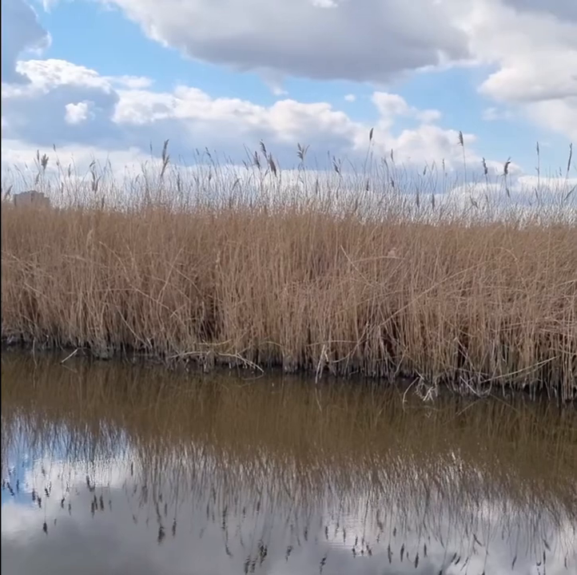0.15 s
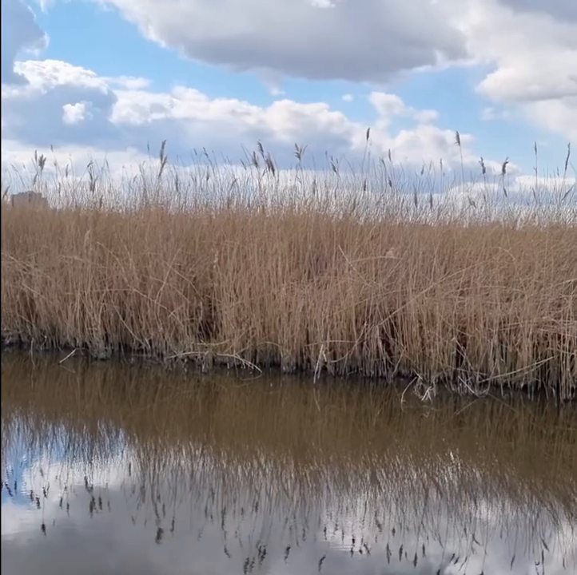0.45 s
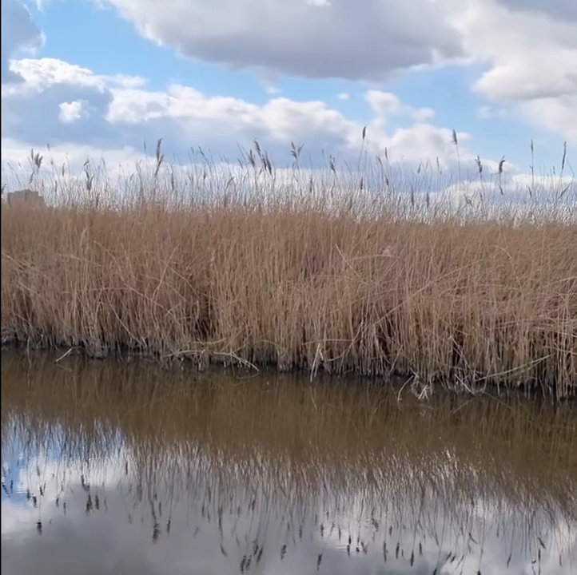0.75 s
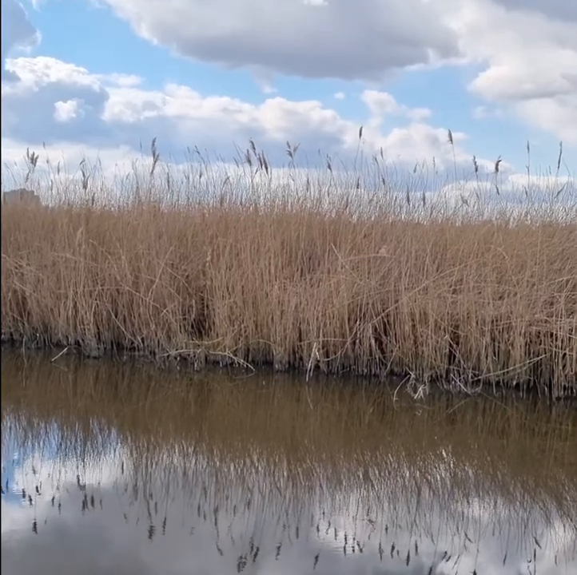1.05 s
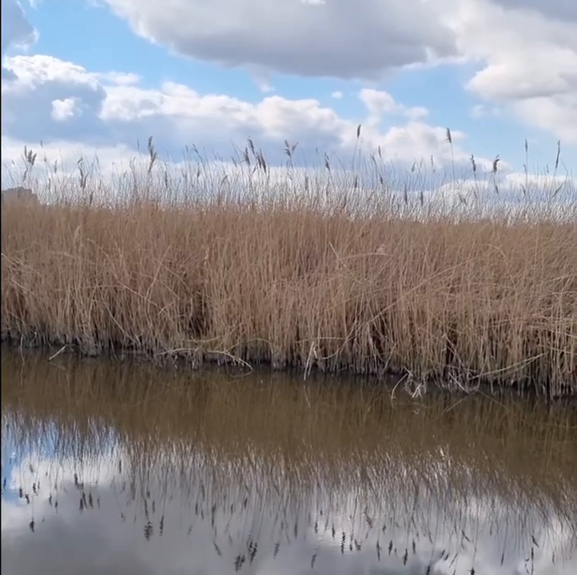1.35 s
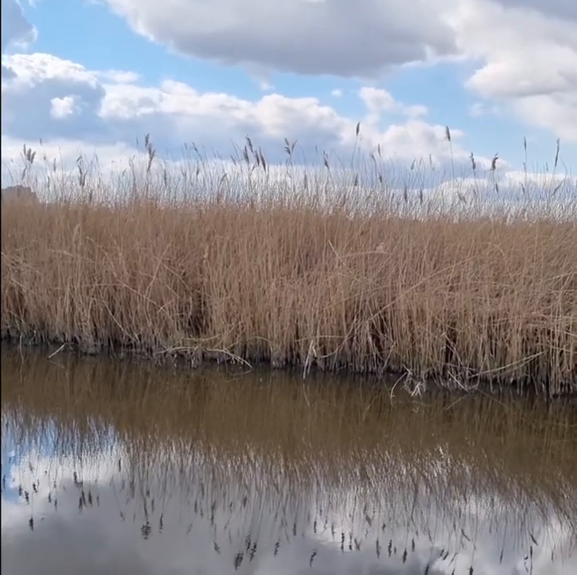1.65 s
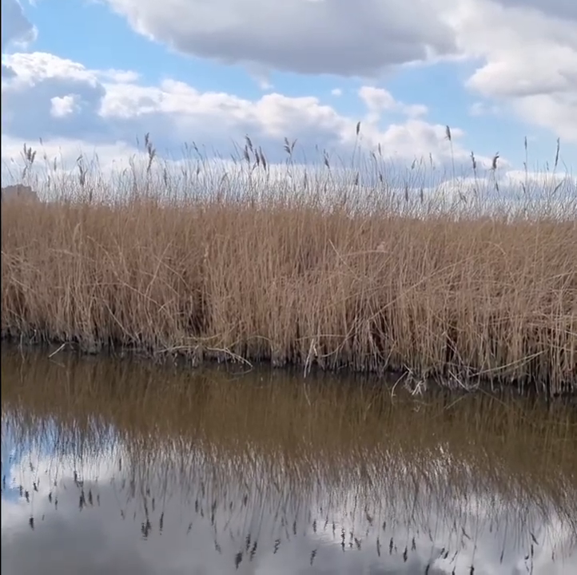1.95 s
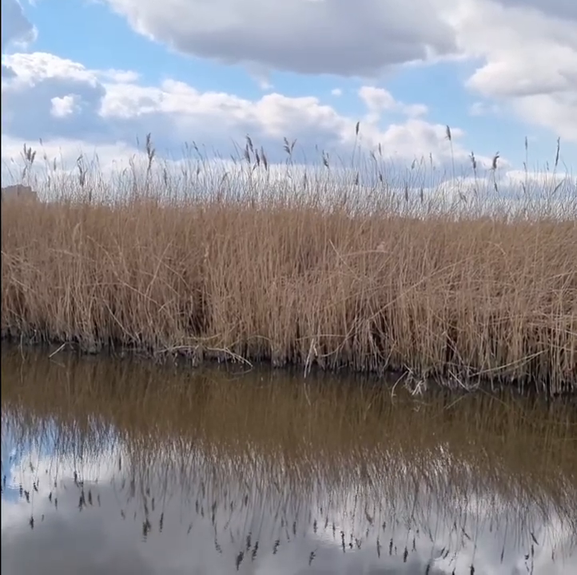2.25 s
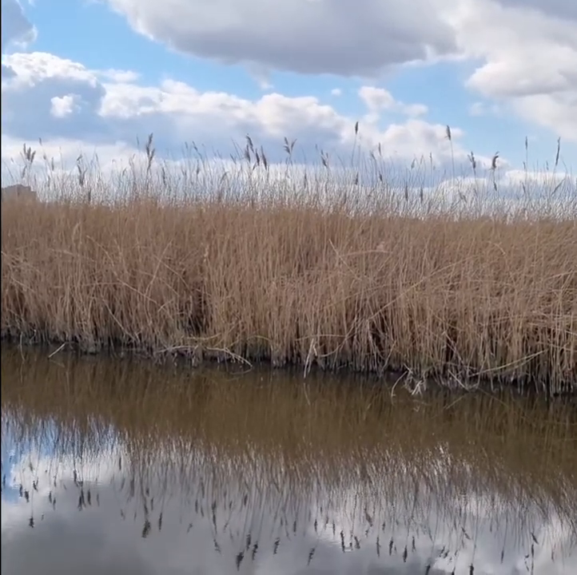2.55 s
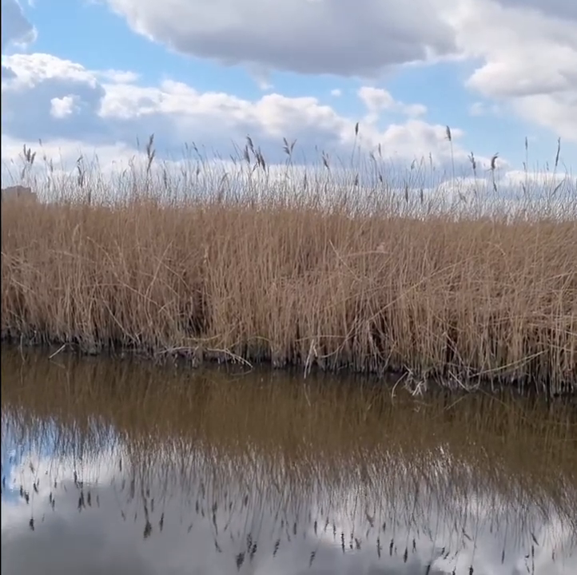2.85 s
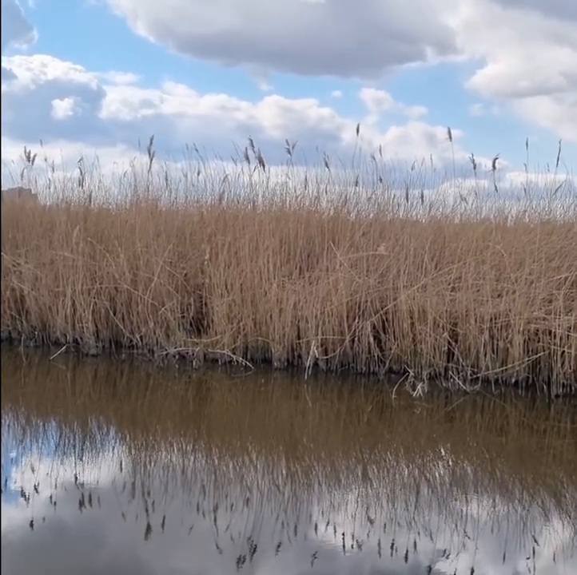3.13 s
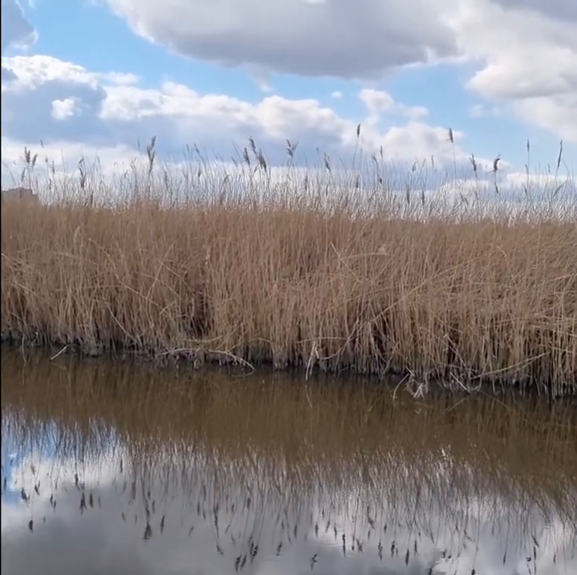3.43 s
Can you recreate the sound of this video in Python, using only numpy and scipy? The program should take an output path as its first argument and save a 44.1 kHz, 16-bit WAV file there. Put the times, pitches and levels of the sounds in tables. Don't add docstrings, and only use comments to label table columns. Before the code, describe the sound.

An unseen bird in waterside reeds repeats bright sweeping notes, then trills, chatters harshly, flicks upward and ends in pulsed rattles, over wind rumble on a phone microphone, faint leaf hiss and distant traffic to the left.

```python
import sys
import numpy as np
from scipy import signal
from scipy.fft import rfft, irfft
from scipy.io import wavfile
from scipy.ndimage import uniform_filter1d

SR = 44100
rng = np.random.default_rng(int(sys.argv[2]) if len(sys.argv) > 2 else 0)


def output_pcm(signal):
    pcm = np.clip(np.atleast_2d(signal).T, -1, 1) * 32767
    wavfile.write(sys.argv[1], SR, np.round(pcm).astype(np.int16))


def gain_from_db(level_db):
    decades = np.asarray(level_db, float) / 20
    return 10 ** decades


N = 158319
T = np.arange(N) / SR
BINS = np.arange(N // 2 + 1) * SR / N + 1e-3
START_S = 0.14872
CLEAR, HARSH = 0.33, 0.58
RASP_HZ, WAVER = 1500, 0.005
MAX_SYLLABLE = 9000


def colour(table):
    hz, db = np.array(table).T
    log_hz = np.log(BINS)
    below = np.maximum(np.log(hz[0]) - log_hz, 0)
    above = np.maximum(log_hz - np.log(hz[-1]), 0)
    return gain_from_db(np.interp(log_hz, np.log(hz), db) - 60 * (below + above))


def walk(rate, size=N):
    hold = max(int(SR / rate), 1)
    steps = np.repeat(rng.standard_normal(size // hold + 1), hold)
    return 1.3 * uniform_filter1d(uniform_filter1d(steps, hold), hold)[:size]


def bed(table, db, pan_db, diffuse, lead_rad, swell_db, flicker_db, rate):
    noise = rfft(rng.standard_normal((3, N))) * colour(table)
    share = np.clip(diffuse, 0, 1)
    lead = np.exp(1j * lead_rad * np.array([[1], [0]]))
    pair = np.sqrt(1 - share) * noise[0] * lead + np.sqrt(share) * noise[1:]
    swell = walk(2.5)
    place = 2 * np.log2(BINS)
    first = int(2 * np.log2(table[0][0])) - 1
    last = int(2 * np.log2(table[-1][0])) + 1
    out = 0
    for k in range(first, last + 1):
        band = irfft(pair * np.clip(1 - abs(place - k), 0, 1), N)
        out = out + band * gain_from_db(swell_db * swell + flicker_db * walk(rate))
    out = out * gain_from_db(np.array([[pan_db], [-pan_db]]) / 2)
    return out * gain_from_db(db) / np.sqrt(np.mean(out.mean(axis=0) ** 2))


def add_syllable(out, at_s, shape, orders, db=0, stretch=1, rough=CLEAR, pitch=1, air_db=-99):
    s, hz, level_db, bright_db = np.array(shape, float).T
    s = (s - s[0]) * stretch
    t = np.arange(int(s[-1] * SR)) / SR

    def smooth(values):
        return uniform_filter1d(np.interp(t, s, values), 132, mode="nearest")

    waver = 1 + WAVER * walk(300, MAX_SYLLABLE)[:len(t)]
    phase = 2 * np.pi * np.cumsum(pitch * smooth(hz) * waver) / SR
    edge = np.clip(np.minimum(t, s[-1] - t) / 0.0012, 0, 1)
    level = smooth(level_db) + db
    i = int(at_s * SR)
    out[i:i + len(t)] += edge * gain_from_db(level + air_db) * rng.standard_normal(len(t))
    for k, (multiple, order_db) in enumerate(orders):
        rasp = 1 + rough * walk(RASP_HZ, MAX_SYLLABLE)[:len(t)]
        size = gain_from_db(level + order_db + k * smooth(bright_db)) * rasp
        out[i:i + len(t)] += edge * size * np.sin(multiple * phase + k * k)


def arch(length, hz0, hz1, db, bright_db, top, fall):
    u = np.linspace(0, 1, num=12)
    rising = np.sin(1.2 * np.clip(u / top, 0, 1)) / np.sin(1.2)
    falling = 1 - fall * ((u - top) / (1.001 - top)) ** 2
    bend = np.where(u < top, rising, falling)
    level_db = db - 17 * abs((u - 0.55) / 0.55) ** 2
    return np.c_[u * length, hz0 + (hz1 - hz0) * bend, level_db, bright_db + 0 * u]


# band_hz, level_db (dB per Hz)
WIND = [(22, -30), (42, -7.5), (64, 1.5), (100, -6), (151, -16.5), (198, -15.5), (250, -23.5)]


def wind():
    return bed(WIND, -46, -0.17, 0.017 * (1 + (BINS / 90) ** 2), 0.3, 1.6, 1.48, 12)


# band_hz, level_db (dB per Hz)
ENGINES = [(240, -3), (300, 1.5), (400, -0.5), (480, -7)]
# time_s, level_db
ENGINE_SWELL = [(0, -4), (.6, -5.5), (1.3, 1.5), (1.7, -1.5), (3.59, 1.5)]


def engines():
    swell = gain_from_db(np.interp(T, *np.array(ENGINE_SWELL).T))
    return bed(ENGINES, -64, 1.8, 0.13, 0.5, 0.87, 1.5, 10) * swell


# band_hz, level_db (dB per Hz)
ROAD = [(480, -14), (627, -8.5), (786, 1.5), (985, 1), (1160, -1), (1510, -13), (2200, -23.5)]


def road():
    return bed(ROAD, -50.5, 7.56, 0.24, 0.72, 0.79, 1.02, 12)


# band_hz, level_db (dB per Hz)
REEDS = [(2200, -1.5), (3600, -1), (5000, -13.5), (6050, -20.5), (7300, -32)]


def reeds():
    return bed(REEDS, -75.5, -0.37, 1.0, 0, 0.82, 1.0, 8)


# band_hz, level_db (dB per Hz)
HISS = [(7300, 2.5), (9500, -0.5), (12000, 3.5), (15500, 3.5)]


def top_hiss():
    return bed(HISS, -97.5, -1, 1, 0, 0.3, 0.4, 8)


# time_s, pitch_hz, level_db, brightness_db
SWEEP = [(0, 2870, -61.5, -3.5), (.007, 3150, -51, 0), (.014, 3530, -54, 1), (0.022, 3580, -51, -5.5),
         (0.034, 3370, -56.5, 0.5), (.058, 3350, -56.5, -5.5), (.083, 2980, -68.5, 4.5),
         (.093, 2960, -71, -13), (.125, 2860, -66.5, -29.5), (.145, 2960, -77.5, -26.5)]
# multiple, level_db
SWEEP_ORDERS = [(1, -2), (1.5, -3)]
# multiple, level_db
SWEEP_TOP = [(2, -3)]
# start_s, level_db, stretch (ratio), pitch (ratio)
SWEEPS = [
    (0.147, 2, 1.07, 0.98),
    (0.376, 3, 0.97, 1.05),
    (0.612, 3, 1.07, 1.017),
    (0.865, 5, 1.0, 1.018),
    (1.123, 4, 1.08, 1.018),
]


def sweeps(out):
    for s, db, stretch, pitch in SWEEPS:
        add_syllable(out, s, SWEEP, SWEEP_ORDERS, db, stretch, pitch=pitch, air_db=-11)
        add_syllable(out, s, SWEEP[:4], SWEEP_TOP, db, stretch, rough=HARSH, pitch=pitch)


# band_hz, level_db
SONG_COLOUR = [(1300, -26.5), (2000, -6), (3000, -2), (5000, -4.5), (5900, -12), (6900, -19), (7600, -27),
               (8300, -42.5)]
# centre_hz, lift_db
THROAT = [(3620, 8), (4200, 4), (4720, 7), (5350, 7), (6450, 8)]


def tail(t60_s, db):
    decay = rng.standard_normal((2, N)) * gain_from_db(-60 * T / t60_s)
    return rfft(decay) / np.sqrt(np.sum(decay ** 2, axis=1, keepdims=True)) * gain_from_db(db)


def pond(song):
    pan_db, lag_s, width_hz = -6.5, -0.000044, 150
    direct = np.exp(-2j * np.pi * BINS * lag_s * np.array([[1], [0]]))
    near = direct + tail(0.11, -7.5)
    pan = gain_from_db(np.array([[pan_db], [-pan_db]]) / 2)
    lift_db = sum(db * np.exp(-((BINS - hz) / width_hz) ** 2 / 2) for hz, db in THROAT)
    voice = rfft(song) * colour(SONG_COLOUR) * gain_from_db(lift_db)
    return irfft(voice * (near * pan + tail(0.33, -12.5)), N)


# start_s, length_s, level_db
RISES = [
    (0.294, 0.027, -63.5),
    (0.51, 0.047, -57.5),
    (0.762, 0.05, -58.5),
    (1.019, 0.051, -58.5),
]


def rises(out):
    for s, length, db in RISES:
        shape = arch(length, 3060, 3960, db, -26.5, 1.0, 0)
        add_syllable(out, s, shape, [(1, 0.01), (1.5, 0)], rough=HARSH, air_db=-11)


# start_s, length_s, start_hz, middle_hz, end_hz,
# level_db
WHISTLES = [(0.31, 0.0094, 3600, 3400, 3500, -60.5), (.552, 0.009, 4500, 3710, 3580, -58),
            (1.229, 0.023, 3650, 3700, 3600, -66.5), (1.346, 0.019, 3200, 3650, 3600, -63.5),
            (1.367, 0.018, 3500, 3600, 3900, -58), (1.399, 0.023, 3000, 3200, 3600, -59.5),
            (1.44, 0.028, 3400, 3800, 4250, -58.5), (1.728, 0.041, 4005, 3860, 3200, -53.5),
            (1.915, 0.026, 3820, 3580, 3150, -64.5), (2.087, .04, 3700, 3300, 3500, -72.5),
            (2.243, 0.024, 4200, 3700, 3390, -67), (2.36, 0.024, 2800, 3340, 3100, -53),
            (2.335, .025, 3200, 4000, 4100, -59), (3.3, 0.13, 5950, 5480, 5150, -67.5),
            (3.267, .045, 6900, 6750, 6600, -71), (3.237, 0.034, 5250, 4400, 5150, -73),
            (0.88, .016, 6000, 5400, 6050, -56.5)]


def thin_whistles(out):
    for s, length, hz0, hz_mid, hz1, db in WHISTLES:
        shape = [(0, hz0, db - 6, 0), (length / 2, hz_mid, db, 0), (length, hz1, db - 7, 0)]
        add_syllable(out, s, shape, [(1, 0)], rough=0.45)


# start_s, length_s, start_hz, top_hz, level_db
TRILL = [
    (1.32, 0.037, 2476, 2980, -54),
    (1.371, 0.047, 2340, 3010, -48.5),
    (1.431, 0.038, 2460, 3286, -47),
    (1.49, 0.029, 2566, 3320, -48),
]
# brightness_db, rise (share of length), fall (share of bend)
TRILL_SHAPE = [(2.5, 0.32, 0.44), (-21, 0.41, .9), (-27, 0.36, 0.33), (-29, 0.59, 0.24)]


def trill(out):
    orders = [(1, 0.007), (1.5, 0.0055), (2, 0.0074)]
    for (s, length, hz0, hz1, db), shape in zip(TRILL, TRILL_SHAPE):
        add_syllable(out, s, arch(length, hz0, hz1, db, *shape), orders, air_db=-11)


# start_s, peak_db
TICKS = [
    (1.493, -75),
    (1.853, -71.5),
    (2.379, -95),
    (2.982, -76),
]


def ticks():
    out = np.zeros(N)
    for s, db in TICKS:
        decay = (T > s) * np.exp(-np.maximum(T - s, 0) / 0.0015)
        out += gain_from_db(db - 3.5) * rng.standard_normal(N) * decay
    return irfft(rfft(out) * colour([(5500, -0.5), (12000, -1.5), (15500, -3.5)]), N)


# time_s, pitch_hz, level_db, brightness_db
CHAT = [(0, 3036, -66.5, -10), (.003, 2562, -49.5, -10.5), (.007, 2186, -58.5, -2.5),
        (0.012, 1833, -55, 1.5), (.02, 1640, -56.5, 2), (0.028, 1455, -57.5, -13.5),
        (0.032, 1420, -85, -12)]
# multiple, level_db
CHAT_ORDERS = [(1, -6.5), (2, -4.5), (3, -7), (4, -10)]
# start_s, level_db, inharmonic_db, air_db
CHATS = [
    (1.58, -1, -6, -16),
    (1.619, 2.5, 2, -13.5),
    (1.703, 2, -19.5, -3.5),
    (1.743, 0.5, 1, 0),
    (1.838, 0.5, -22, -13),
    (1.877, 2.5, -7.5, -3.5),
    (1.969, -1, -14.5, 0),
    (2.01, 4.5, -5.5, -6),
    (2.104, 0, -9, -0.5),
    (2.143, 0.5, -11, -2),
]


def chatters(out):
    for s, db, inharmonic_db, air_db in CHATS:
        add_syllable(out, s, CHAT, CHAT_ORDERS, db, air_db=air_db)
        add_syllable(out, s, CHAT[2:], [(2.8, -5)], db + inharmonic_db, rough=HARSH)


# time_s, level_db (over the top of the hiss)
RUSTLE = [(1.62, -26.5), (1.68, 4), (1.9, 0.5), (1.95, -32)]


def rustle(hiss):
    treble = irfft(rfft(hiss) * (BINS > 11000), N)
    return gain_from_db(np.interp(T, *np.array(RUSTLE).T)) * treble


# time_s, pitch_hz, level_db, brightness_db
FLICK = [(0, 1130, -68, 7), (.004, 1344, -60, 0.5), (.01, 1830, -58.5, 0.5), (0.015, 2460, -58.5, -3.5),
         (0.021, 2650, -71, -5)]
# start_s, level_db
FLICKS = [
    (2.261, 1),
    (2.425, 3.5),
    (2.627, 0.5),
    (2.81, 1.5),
]


def flicks(out):
    for s, db in FLICKS:
        add_syllable(out, s, FLICK, [(2, -0.5), (3, -8.5), (4, -11), (5, -20)], db, air_db=1)


# time_s, pitch_hz, level_db, brightness_db
FAN = [(0, 556, -81, 3.5), (.012, 663.4, -68, 2), (.027, 873, -69, 2), (.042, 1069, -59, -2.5),
       (.057, 1154, -57.5, -0.5), (0.066, 1270, -62, -2), (.078, 1750, -52.5, -14.5),
       (.088, 2495, -55.5, -22), (0.092, 2520, -66, -13)]
# multiple, level_db
FAN_ORDERS = [(2, -4), (3, 0), (4, 2), (5, -3), (6, -7), (7, -10)]
# start_s, level_db, stretch (ratio), pitch (ratio)
FANS = [
    (2.296, -2, 1.0, 1.11),
    (2.456, 0, 0.98, 1.02),
    (2.662, -0.5, 1.0, 1.0),
    (2.846, -1, 1.03, 1.01),
]


def fans(out):
    for s, db, stretch, pitch in FANS:
        add_syllable(out, s, FAN, FAN_ORDERS, db, stretch, rough=HARSH, pitch=pitch, air_db=0)


# start_hz, end_hz
RATTLE_TONES_HZ = [(2380, 2470), (3870, 4230), (4650, 4980), (3500, 3600), (6330, 6370)]
# level_db, swell_db, roughness (ratio)
RATTLE_LINES = [(3.5, 17, 0.16), (1.5, 10.5, 0.35), (-6, 23.5, .6), (-12.5, 14, .6), (-14.5, 11.5, .15)]
# last_pulse_s, length_s, level_db, pitch (ratio), pulse_hz
RATTLES = [
    (3.228, 0.16, -58, 1.035, 61),
    (3.483, 0.15, -57, 1, 62.3),
]


def rattle(last_s, length, db, share, pulse_hz):
    duty, leak, jitter = 0.8, 1.7, 0.04
    u = np.clip((T - last_s) / length + 1, 0, 1)
    cycle = ((T - last_s) * pulse_hz + jitter * walk(90) + 0.5) % 1 - 0.5
    gate = np.cos(np.pi / 2 * np.clip(2 * cycle / duty, -1, 1))
    glide = np.clip(2.2 * u - 0.3, 0, 1)
    out = 0
    for (hz0, hz1), (line_db, swell_db, rough) in zip(RATTLE_TONES_HZ, RATTLE_LINES):
        hz = share * (hz0 + (hz1 - hz0) * glide) * (1 + 0.006 * walk(120))
        phase = 2 * np.pi * np.cumsum(hz) / SR
        pulses = gate + rough * (leak + gate) * walk(900)
        out = out + gain_from_db(db + line_db - swell_db * (1 - u)) * pulses * np.sin(phase)
    span = np.clip(1.9 * u, 0, 1) * (T < last_s + 0.5 / pulse_hz)
    return out * uniform_filter1d(span, size=200)


def scene():
    song = np.zeros(N)
    for voice in (sweeps, rises, thin_whistles, trill, chatters, flicks, fans):
        voice(song)
    song += sum(rattle(*row) for row in RATTLES)
    hiss = top_hiss()
    return wind() + engines() + road() + reeds() + hiss + pond(song) + ticks() + rustle(hiss)


def top_cut(x):
    return signal.sosfilt(signal.butter(12, 15720, fs=SR, output="sos"), x)


def record(dry):
    open_s = 0.0008
    opening = np.clip((T - START_S) / open_s, 0, 1)
    closing = np.clip((T[-1] - T) / 0.0015, 0, 1)
    click = gain_from_db(-39.5) * np.exp(-abs(T - START_S) / open_s) * (T >= START_S)
    mix = dry * closing * opening - click
    return top_cut(mix)


dry = scene()
out = record(dry)
output_pcm(out)
```